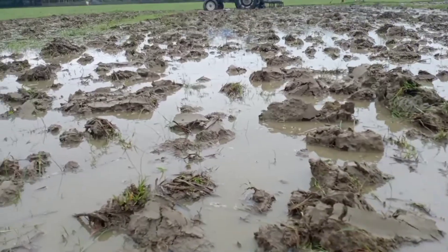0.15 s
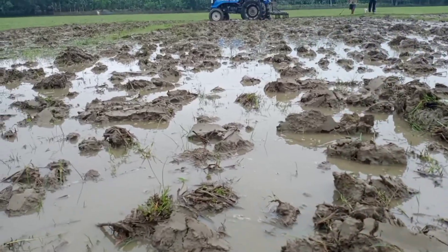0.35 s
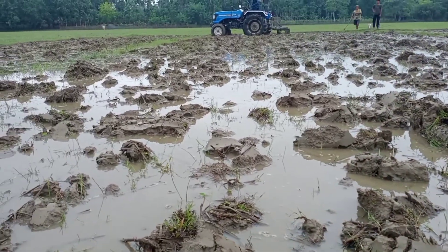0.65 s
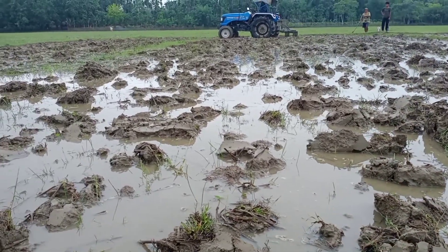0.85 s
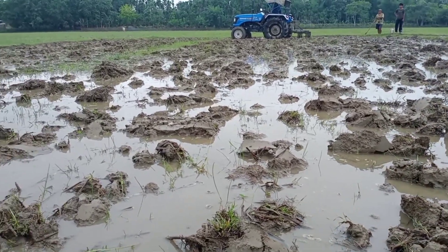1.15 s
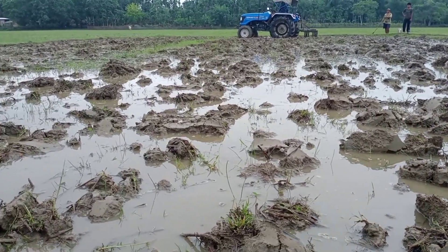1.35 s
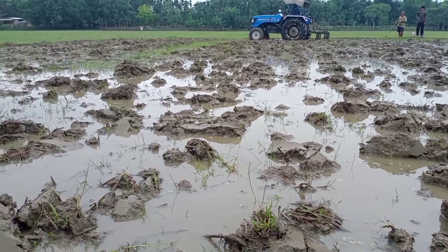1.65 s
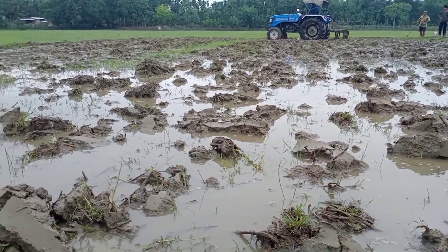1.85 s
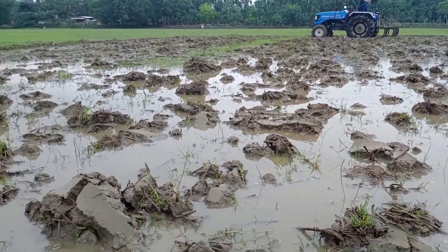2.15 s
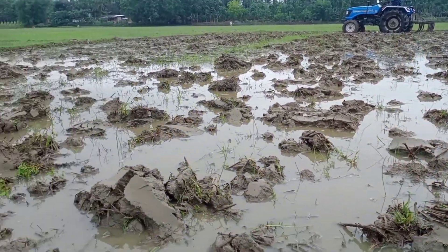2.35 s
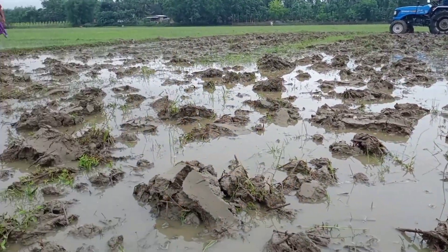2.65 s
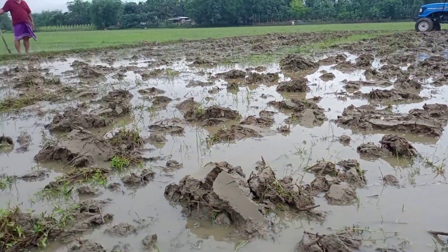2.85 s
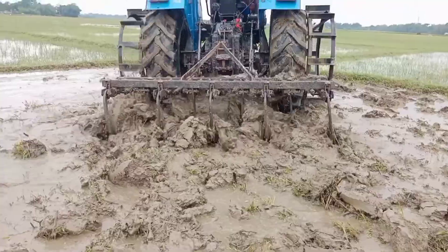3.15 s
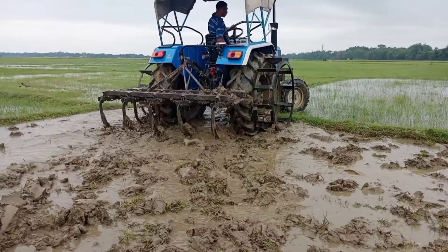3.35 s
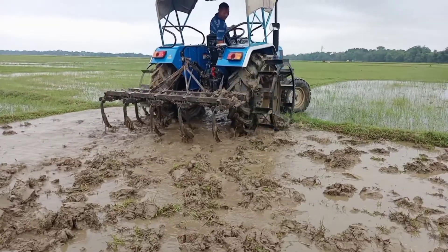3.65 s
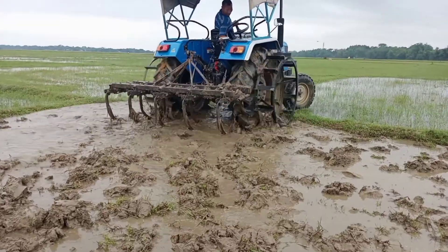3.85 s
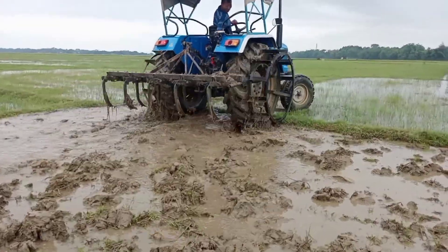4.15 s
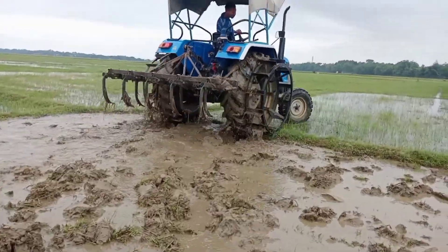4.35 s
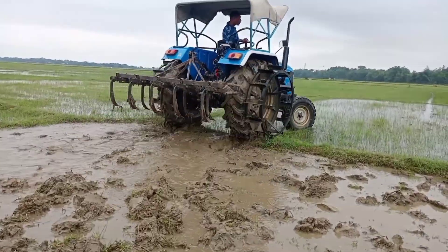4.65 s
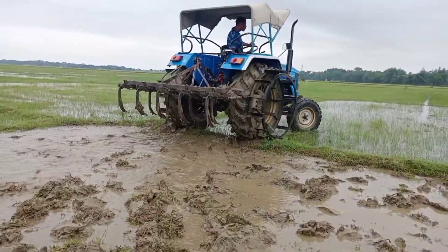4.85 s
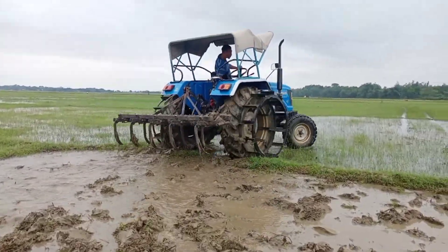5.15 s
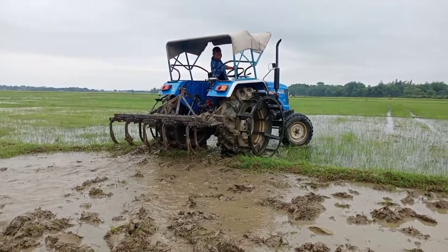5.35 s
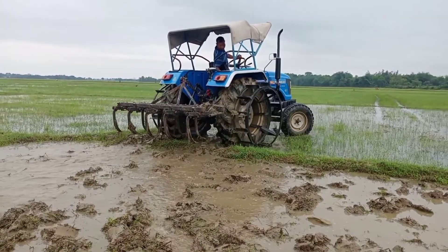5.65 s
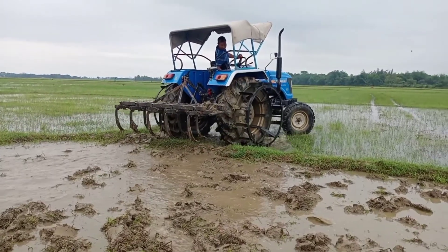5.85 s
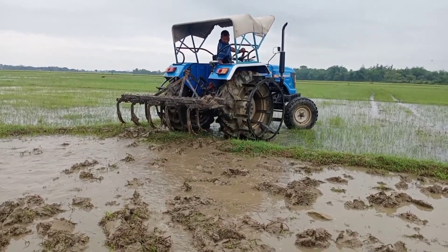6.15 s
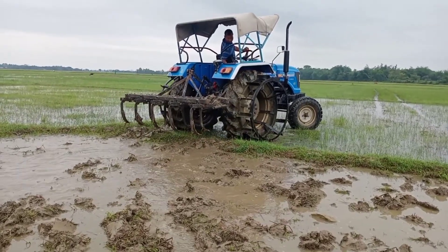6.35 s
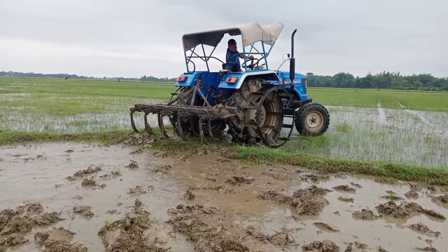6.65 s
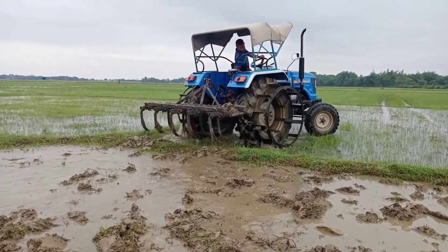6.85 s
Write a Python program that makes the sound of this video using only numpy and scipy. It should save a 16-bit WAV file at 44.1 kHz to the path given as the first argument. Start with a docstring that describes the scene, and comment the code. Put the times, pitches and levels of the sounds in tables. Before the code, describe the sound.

Distant tractor hum and knock in light wind, a brief silent gap, then a near diesel engine labouring, easing and pulling again amid gusts and clanking steel.

```python
"""A three-cylinder diesel tractor works a flooded field: first far off, then, after a silent gap, close by.
Far off its exhaust is a sum of firing-rate harmonics; close by, gas pulses ring the pipe. Noise bursts
at each firing ring the block, harder at open throttle; fan and gears whirr and wheels spray as shaped noise.
Gusts buffet the phone's microphone with low noise and slowing swings; close by, a short harsh surge is
heard and the implement clanks as decaying narrow noise with a bright tick."""
import sys
import numpy as np
from scipy import signal
from scipy.fft import rfft, irfft, next_fast_len
from scipy.io import wavfile
from scipy.ndimage import uniform_filter1d

SR = 44100
rng = np.random.default_rng(int(sys.argv[2]) if len(sys.argv) > 2 else 0)


def field_ratio(decibels):
    """Amplitude ratio for a level in dB (20 dB per decade); scalars and array-likes work."""
    return 10 ** (np.asarray(decibels, dtype=float) / 20)


def to_wav(s):
    """Save 16-bit WAV."""
    ch = np.atleast_2d(s).T  # columns
    pcm = np.round(np.clip(ch, -1, 1) * 32767)  # PCM
    wavfile.write(sys.argv[1], SR, pcm.astype(np.int16))


N = 308700
T = np.arange(N) / SR
FAR, NEAR = 0, 1  # the two parts, and the index of each in tables kept per part


def unit(x):
    """Normalisation: scale a signal to rms 1."""
    return x / np.sqrt(np.mean(x ** 2))


def ring(x, hz, width):
    """Resonance: a second-order peak with gain 1 at its centre."""
    return signal.lfilter(*signal.iirpeak(hz, hz / width, SR), x)


def colour(x, points):
    """Spectral shaping: gain interpolated in dB over log frequency between (Hz, dB) points."""
    hz, db = np.transpose(points)
    size = next_fast_len(len(x))
    log_hz = np.log(np.arange(size // 2 + 1) * SR / size + 1)
    gain = field_ratio(np.interp(log_hz, np.log(hz), db))
    return irfft(rfft(x, size) * gain, size)[:len(x)]


def walk(rate):
    """Slow random modulation: levels held 1 / rate seconds, smoothed twice, rms 1."""
    hold = int(SR / rate)
    steps = np.repeat(rng.standard_normal(N // hold + 1), hold)
    smooth = uniform_filter1d(uniform_filter1d(steps, hold), hold)
    return unit(smooth[:N])


def gains(table):
    """Envelope interpolation: the dB columns of a timed table as gains at every sample."""
    s, *columns = np.transpose(table)
    return [field_ratio(np.interp(T, s, db)) for db in columns]


def span(start_s, end_s, rise_s, fall_s):
    """Smooth gating: a gain that rises along a tanh to 1, holds and falls again."""
    return (1 + np.tanh((T - start_s) / rise_s)) * (1 - np.tanh((T - end_s) / fall_s)) / 4


# per part, engine speed, sagging under load and recovering: time_s, firing_rate_hz
ENGINE_SPEED = [
    [(0, 23.71), (.35, 27.72), (.9, 27.61), (1.2, 26.5), (3.1, 27.01)],
    [(3.1, 24.21), (3.85, 24.21), (4.1, 23.21), (4.45, 20.8), (4.62, 22.92), (4.85, 26.04), (5.5, 27.46),
     (6.6, 27.02), (6.78, 24.92), (6.87, 22.18), (7, 21.99)],
]
# per part: share of a firing interval gone at the first speed row
CYCLE_AT_START = [.52, .46]


def firings(part):
    """Phase accumulation: integrated firing rate gives firing number, seconds since it began, and rate."""
    rate = np.interp(T, *np.transpose(ENGINE_SPEED[part]))
    turn = np.cumsum(rate) / SR
    turn_at_first_row = np.interp(ENGINE_SPEED[part][0][0], T, turn)
    turn = turn + (CYCLE_AT_START[part] - turn_at_first_row) % 1
    number = turn.astype(int)
    return number, T - np.interp(number, turn, T), rate


# per part, resonances of block and panels: pitch_hz, width_hz, level_db (over the broad knock)
BLOCK_RINGS = [
    [(2354, 100, 13), (3920, 120, -0.5), (870, 40, -23), (1442, 11, 11.5), (9300, 170, -6.5)],
    [(553, 150, 7.5), (603, 114, 3), (1106, 75, -1), (1512, 32, 7), (2180, 180, 1), (2400, 150, 1),
     (2935, 320, 5), (3630, 250, 3.5), (4020, 93, 1.5), (4680, 50, -2), (8550, 115, 6.5), (10060, 280, -8)],
]
# per part, spectrum of the knock as it arrives over the water: pitch_hz, gain_db
KNOCK_SPECTRUM = [
    [(200, -33), (300, 4.5), (485, -12.5), (852, -9), (1400, -12.5), (2340, -20), (4000, -16),
     (5600, -29.5), (8500, -21), (12000, -41), (16000, -20)],
    [(200, -38), (350, -9.5), (560, -10), (680, -8), (800, -19), (1070, -1.5), (1400, -14.5), (1890, -14.5),
     (4040, -15.5), (5700, -16.5), (8500, -23), (12000, -22), (16000, -24.5)],
]
# spectrum of a bright tick, of the injector and of steel: pitch_hz, gain_db
TICK_SPECTRUM = [(1500, -29), (4000, -1), (9000, -5), (13000, -6), (16000, 0.5)]
# the tractor turns another side to the phone:
# time_s, change_db (of the first two block rings), chug_db (basic chug depth of the whirr)
ASPECT = [(0, -8, 4), (.9, 1, 5), (1.8, 1, 5), (3, -5, 5), (3.2, 0, 2), (4.85, 0, 4), (5.2, -6, 7)]


def knock(part, number, since, rise_s, tail_db, tail_s, tail_hz, scatter_db, mode_scatter_db,
          tick_db, tick_scatter_db):
    """Impulsive excitation of modes: a combustion burst and duller rattle ring block and panels."""
    chance = rng.standard_normal((number[-1] + 1, 1 + len(BLOCK_RINGS[part])))
    strength = chance[number, 0]
    swell = since / rise_s
    burst = swell ** 2 * np.exp(2 - 2 * swell) * rng.standard_normal(N)
    dull = signal.lfilter(*signal.butter(1, tail_hz, fs=SR), rng.standard_normal(N))
    rattle = field_ratio(tail_db) * np.tanh(swell) * np.exp(-since / tail_s) * dull
    broad = colour(field_ratio(scatter_db * strength) * (burst + rattle), KNOCK_SPECTRUM[part])

    # each firing drives each resonance with its own strength
    rings = []
    for k, (hz, width, db) in enumerate(BLOCK_RINGS[part]):
        drive = field_ratio(db + mode_scatter_db * chance[number, k + 1]) * broad
        rings.append(ring(drive, hz, width))
    facing = gains(ASPECT)[0]
    body = broad + facing * sum(rings[:2]) + sum(rings[2:])

    # the injector needle ticks as the pressure rises
    tick_swell = swell * np.exp(-3 * swell) * field_ratio(tick_scatter_db * strength)
    tick = colour(tick_swell * rng.standard_normal(N), TICK_SPECTRUM)
    return unit(body) + field_ratio(tick_db) * unit(tick)


# per part, spectrum of the whirr as it arrives over the water: pitch_hz, gain_db
WHIRR_SPECTRUM = [
    [(60, -28.5), (120, -7), (250, -13.5), (413, -8), (489, -17.5), (847, -12.5), (1290, -21), (2340, -27),
     (4000, -34.5), (5600, -64), (8500, -44.5), (12000, -60.5), (16000, -40)],
    [(60, -13.5), (120, -0.5), (200, -5.5), (356, -18.5), (671, -10.5), (812, -27.5), (982, -9.5),
     (1320, -18), (1700, -16), (1890, -22), (4050, -27), (8000, -40.5), (16000, -60)],
]
# per part, gear and panel whines: pitch_hz, width_hz, level_db (over the hiss)
WHINES = [
    [(561, 14, -13.5), (880, 6, -22), (1435, 3.7, -19.5), (1750, 12, -20.5), (1963, 12, -21.5),
     (2365, 28, -17.5)],
    [(190, 7.1, -6.5), (973, 88, -12), (1195, 39, -15), (1420, 40, -16), (1723, 11, -20), (2283, 34, -22.5)],
]


def whirr(part, since, flicker_db, chug_s, hiss_share):
    """Amplitude-modulated noise: fan, valves, gears and churned water chug with the firings."""
    swell = since / chug_s
    chug = gains(ASPECT)[1] ** (swell * np.exp(1 - swell))
    gain = field_ratio(flicker_db * walk(60)) * chug
    # the powers set how deep each chugs: the whines more than the hiss
    sound = unit(colour(gain ** hiss_share * rng.standard_normal(N), WHIRR_SPECTRUM[part]))
    for hz, width, db in WHINES[part]:
        sound = sound + field_ratio(db) * unit(ring(gain ** 2 * rng.standard_normal(N), hz, width))
    return sound


# exhaust far off: harmonic (multiple of the firing rate), level_db (relative to each other)
EXHAUST_HARMONICS = [(1, -37), (2, -5.5), (3, 3), (4, 3.5), (5, -24), (6, 1), (7, -1.5), (8, -6.5),
                     (9, -35), (10, -20.5), (11, -12), (12, -11), (13, -14), (14, -13), (15, -8),
                     (16, -12.5)]


def hum(number, since, waver_db, spread):
    """Harmonic series: firing-rate multiples, higher ones lagging, each wavering; a gear mesh sings above."""
    samples_per_firing = np.interp(number, *np.unique(number, return_counts=True))
    turn = number + since / samples_per_firing * SR
    gear_teeth, gear_db, gear_from_s = 32, -12, 1.2  # teeth: mesh pitch over the firing rate
    mesh = np.cos(2 * np.pi * gear_teeth * uniform_filter1d(turn, SR // 10))
    gear_gain = field_ratio(gear_db + waver_db * walk(3.2)) * span(gear_from_s, 2 * T[-1], .2, .2)
    stack = 0
    for k, db in EXHAUST_HARMONICS:
        tone = np.cos(2 * np.pi * (k * turn - spread * k * k))
        stack = stack + field_ratio(db + waver_db * walk(7.24)) * tone
    return gear_gain * mesh + unit(stack)


# spectrum of the spray: pitch_hz, gain_db
SPRAY_SPECTRUM = [(1000, -17.5), (2500, 4), (5600, 2.5), (9000, -1.5), (12000, -7), (16000, -1.5)]


def spray():
    """Many-droplet noise: muddy water from the wheels makes a bright, gritty hiss of drifting colour."""
    grit = field_ratio(2 * walk(500) + walk(25))
    hiss = unit(colour(grit * rng.standard_normal(N), SPRAY_SPECTRUM))
    drift_db = 2.2
    drift = 0
    for hz in [4500, 6500, 8400, 10200, 12500, 15000]:  # each band swells slowly alone
        drift = drift + (field_ratio(drift_db * walk(2.5)) - 1) * ring(hiss, hz, hz / 5)
    # through the far part the hiss has one more high band
    hz, width, bright_db = 9900, 900, -9.5
    band = unit(ring(ring(rng.standard_normal(N), hz, width), hz, width))
    bright = field_ratio(bright_db) * span(0, PARTS[FAR][1], .1, .01) * band
    return hiss + drift + bright


# per part, on light throttle: time_s, knock_db, whirr_db, spray_db
LIGHT_THROTTLE = [
    [(0, -33, -30, -55.5), (.6, -35, -32.5, -46), (1.2, -37.5, -33, -55.5), (1.9, -36, -34.5, -46),
     (2.4, -40, -33, -50), (3, -42, -31.5, -48.5)],
    [(3.16, -44, -17.5, -35), (3.5, -53, -22, -33.5), (4.82, -33, -22, -34.5), (4.92, -36, -27.5, -37),
     (5.3, -56, -24.5, -39), (6.4, -57, -25.5, -43.5), (6.76, -38, -25, -43), (7, -47, -20, -31.5)],
]
# throttle wide open: opens_s, shuts_s, knock_db (added to light throttle), exhaust_db (at 22.5 firings/s)
PULLS = [(3.8, 4.875, -20.5, -19.5), (6.774, 7.2, -18, -17)]


def tractor(part):
    """Superposition under load: far off the knock is smeared and the exhaust hums; close by it thumps."""
    number, since, rate = firings(part)
    knock_gain, whirr_gain, spray_gain = gains(LIGHT_THROTTLE[part])
    exhaust_gain = field_ratio(-30)  # on light throttle
    for opens, shuts, knock_db, exhaust_db in PULLS:
        load = span(opens, shuts, 0.011, 0.024)
        knock_gain = knock_gain + load * field_ratio(knock_db)
        bark = field_ratio(exhaust_db + 1.1 * (rate - 22.5))  # a faster engine barks louder
        exhaust_gain = exhaust_gain * (1 - load) + load * bark
    if part == FAR:
        hits = knock(part, number, since, rise_s=0.004, tail_db=2.5, tail_s=0.029, tail_hz=7000,
                     scatter_db=1, mode_scatter_db=3.5, tick_db=-16, tick_scatter_db=2.5)
        hiss = whirr(part, since, flicker_db=1, chug_s=.01, hiss_share=1.2)
        pipe = hum(number, since, waver_db=1.5, spread=.06)
    else:
        hits = knock(part, number, since, rise_s=0.0058, tail_db=-2.0, tail_s=0.033, tail_hz=3000,
                     scatter_db=0, mode_scatter_db=5.5, tick_db=-13.5, tick_scatter_db=3.5)
        hiss = whirr(part, since, flicker_db=1, chug_s=.0055, hiss_share=.6)
        pipe = exhaust(number, push_s=0.0026)
    return knock_gain * hits + whirr_gain * hiss + exhaust_gain * pipe + spray_gain * spray()


# spectrum of wind on the microphone: pitch_hz, gain_db
WIND_SPECTRUM = [(40, -22.5), (70, 1.5), (130, 2.5), (250, -5), (500, -10), (1000, -29.5), (2000, -68)]
# per part, steady breeze: time_s, level_db
BREEZE = [
    [(0, -38), (1.5, -34), (3, -33)],
    [(3.16, -25), (4.1, -24.5), (4.5, -31), (7, -22.5)],
]
# gusts, added to the breeze: start_s, end_s, level_db
GUSTS = [(1.86, 2.155, -41.5), (3.21, 3.324, -18), (3.674, 3.768, -18), (4.9, 5.048, -26),
         (5.236, 5.5, -24.5), (5.525, 5.583, -22.5), (5.649, 5.837, -19), (5.897, 5.94, -20),
         (5.983, 6.107, -19.5), (6.134, 6.253, -25.5), (6.32, 6.57, -41), (6.697, 6.83, -22.5)]


def wind(part):
    """Turbulent pressure: eddies shake the diaphragm as lumpy low noise and random lesser buffets."""
    gain = gains(BREEZE[part])[0]
    for start, end, db in GUSTS:
        gain = gain + field_ratio(db) * span(start, end, 0.009, 0.009)
    lumps = field_ratio(2 * walk(45)) * rng.standard_normal(N)
    eddies_per_s, eddy_db, eddy_hz = 25, 6.5, 163  # typical spacing, level over the wind, and pitch
    chance = rng.standard_normal((200, 3))
    times = .05 + np.cumsum(field_ratio(3.5 * chance[:, 0])) / eddies_per_s
    rows = []
    for s, (_, loudness, pitch) in zip(times, chance):
        if s < T[-1]:
            rows.append((s, eddy_db + 1.8 * loudness, eddy_hz * field_ratio(2.7 * pitch)))
    return gain * (unit(colour(lumps, WIND_SPECTRUM)) + buffets(rows))


# hard buffets: centre_s, level_db, pitch_hz (at the centre)
HARD_BUFFETS = [(1.878, -19.5, 148), (2.007, -12.5, 114), (2.119, -13, 144), (3.274, -6, 164),
                (3.318, -16, 140), (3.514, -6, 158), (3.679, -7, 275), (3.722, -4.5, 220), (3.751, -4, 225),
                (3.887, -1, 206), (3.97, -6, 118), (4.884, -7.5, 162), (4.901, -4, 156), (4.967, -4, 210),
                (5.247, -5, 165), (5.277, -5, 157), (5.309, -6, 210), (5.397, -6.5, 123), (5.438, -3, 323),
                (5.455, -4.5, 164), (5.66, -1, 155), (5.723, -5, 169), (5.763, -8, 184), (5.816, -5, 200),
                (5.869, 4, 172), (6.002, -0.5, 226), (6.045, -2.5, 132), (6.136, 3.5, 256),
                (6.17, -4.5, 176), (6.232, -6, 242), (6.749, -4, 156), (6.773, -7, 158), (6.991, -4.5, 177)]


def buffets(rows):
    """Saturated pressure pulse: one or two low swings, quick at first and slowing, flattened at the tops."""
    half = SR // 25
    out, t = np.zeros(N + SR), np.arange(-half, half) / SR
    for (s, db, hz), phase in zip(rows, rng.random(len(rows))):
        cycles = t * hz
        swing = np.tanh(1.35 * np.cos(2 * np.pi * (phase + cycles - 0.22 * cycles ** 2)))
        at = int(s * SR) - half
        out[at:at + len(t)] += field_ratio(db) * np.exp(-(cycles / 0.51) ** 2) * swing
    return out[:N]


# close by, exhaust pipe resonances: pitch_hz, width_hz, level_db (relative to each other)
PIPE_RINGS = [(94.5, 19.5, 3.5), (70, 16, -4.5), (195, 26, -10), (276, 210, -20), (560, 120, -5)]


def exhaust(number, push_s):
    """Pulse-excited pipe resonance: each firing pushes a short slug of gas into the pipe."""
    pushes = np.diff(number, prepend=number[0]).astype(float)
    pushes = np.roll(pushes, int(0.00686 * SR))  # seconds behind the firing
    thumps = np.convolve(pushes, np.hanning(int(push_s * SR)), "same")
    return unit(sum(field_ratio(db) * unit(ring(thumps, hz, width)) for hz, width, db in PIPE_RINGS))


# spectrum of the surge: pitch_hz, gain_db
SURGE_SPECTRUM = [(500, -3), (1500, 10), (4000, -16), (6000, 0), (9000, -38), (13000, -1), (16000, -14)]


def surge():
    """Gated broadband noise: a harsh, bright, rough surge soon after the near part begins."""
    start_s, end_s, level_db, edge_s = 3.225, 3.355, -26.5, .012
    rough = field_ratio(2.8 * walk(120)) * rng.standard_normal(N)
    return field_ratio(level_db) * span(start_s, end_s, edge_s, edge_s) * unit(colour(rough, SURGE_SPECTRUM))


# implement clanks: start_s, level_db (before a 5 dB cut of all), pitch_hz, tick_db (over the ring)
CLANKS = [(3.305, -13, 1610, -16), (3.3455, -10.5, 1910, -14), (3.52, -21.5, 1950, 4),
          (4.9227, -19.5, 3540, -18), (5.0258, -28, 1500, 6.5), (5.1389, -8.5, 1980, -3),
          (5.1494, -13.5, 3300, -20), (5.323, -12.5, 1750, -12), (5.377, -12.5, 1770, -26),
          (6.4842, -15, 2350, -15.5), (6.5068, -20.5, 1590, 1), (6.641, -19, 3560, -27),
          (6.66, -16, 2390, -27), (6.7484, -22, 1670, 1)]


def clanks():
    """Damped impact: steel on steel gives a rough ring around one pitch and a bright tick."""
    out, t = np.zeros(N + SR), np.arange(SR // 20) / SR
    onset = 1 - np.exp(-t / 0.00063)
    for s, db, hz, tick_db in CLANKS:
        tick = unit(colour(rng.standard_normal(len(t)), TICK_SPECTRUM)) * np.exp(-t / 0.0069)
        scrape = unit(ring(rng.standard_normal(len(t)), hz, 0.18 * hz)) * np.exp(-t / 0.0063)
        at = int(s * SR)
        out[at:at + len(t)] += field_ratio(db - 5.0) * (field_ratio(tick_db) * tick + scrape) * onset
    return out[:N]


# the far part and the near part: start_s, end_s
PARTS = [(0, 3.001), (3.16, 7.1)]


def scene():
    """Superposition of sources in two parts with silence between them; the near part fades in."""
    extras = buffets(HARD_BUFFETS) + clanks() + surge()
    far, near = [((T >= start) & (T < end)) * (tractor(part) + wind(part) + extras)
                 for part, (start, end) in enumerate(PARTS)]
    fade_s, fade_from_db = 0.091, -23
    fade = field_ratio(fade_from_db * np.clip(1 - (T - PARTS[NEAR][0]) / fade_s, 0, 1))
    return (far + fade * near)[None, :]


def band_limit(x):
    """A steep low-pass at the top of the band."""
    return signal.sosfilt(signal.butter(12, 16210, fs=SR, output="sos"), x)


# response of the phone's microphone port: pitch_hz, gain_db
PORT_RESPONSE = [(25, -19.5), (60, -1.5), (100, -1), (4200, -2.5), (5700, -8.5), (7000, -3), (8900, 7),
                 (10300, 2.5), (11500, -0.5), (13000, -6.5), (14500, -6), (15400, -3.5), (15900, -35)]


def record(dry):
    """Linear filtering, then clipping: the phone's port colours the sound, which clips at full scale."""
    heard = colour(dry[0], PORT_RESPONSE)[None, :] * (dry != 0)  # silence stays silent
    mix = np.clip(heard, -1, 1)
    return band_limit(mix)


dry = scene()
out = record(dry)
to_wav(out)
```